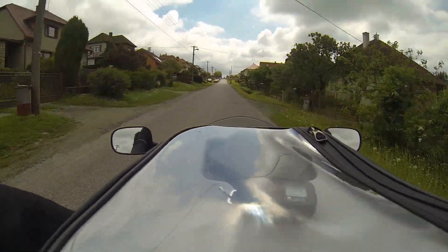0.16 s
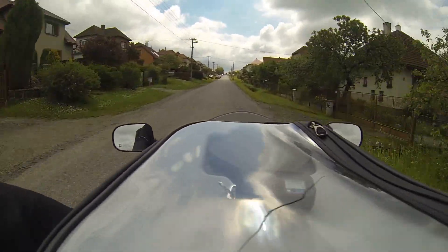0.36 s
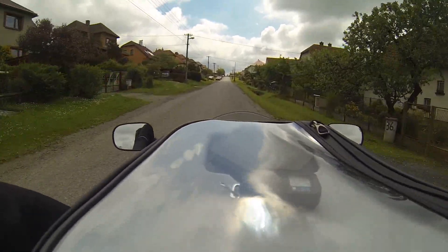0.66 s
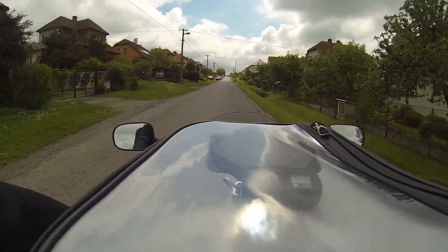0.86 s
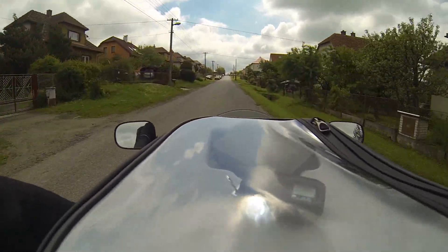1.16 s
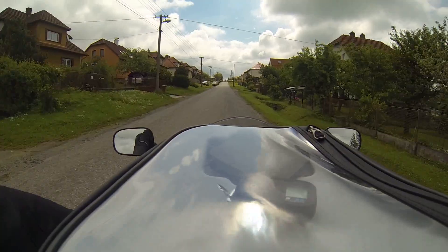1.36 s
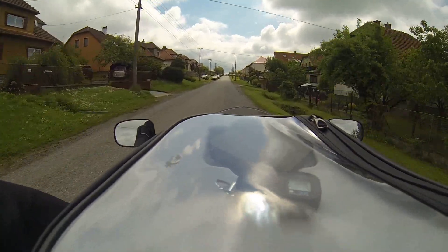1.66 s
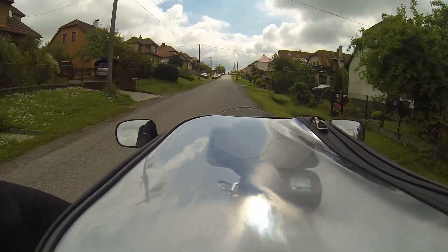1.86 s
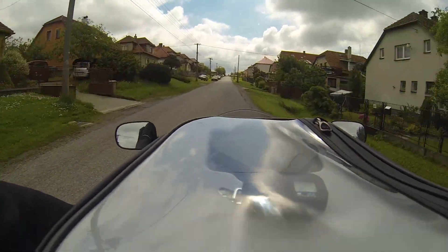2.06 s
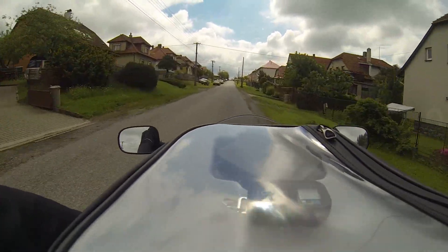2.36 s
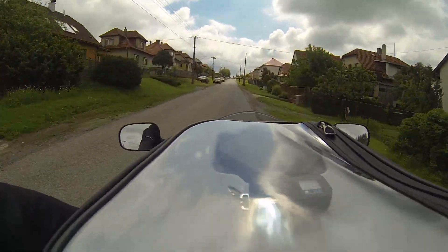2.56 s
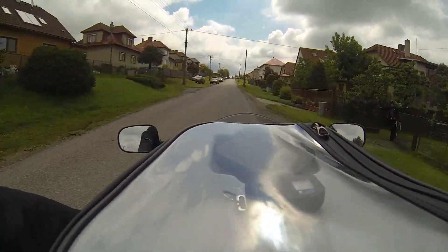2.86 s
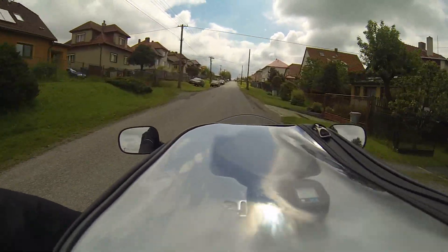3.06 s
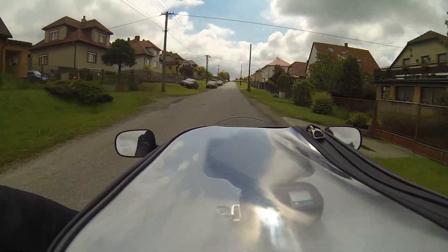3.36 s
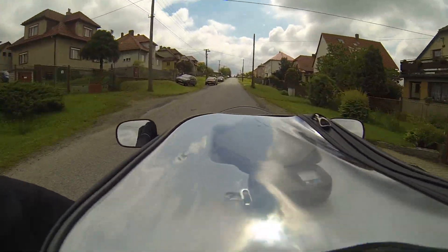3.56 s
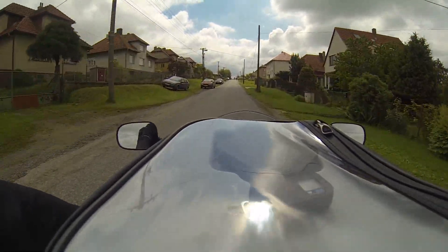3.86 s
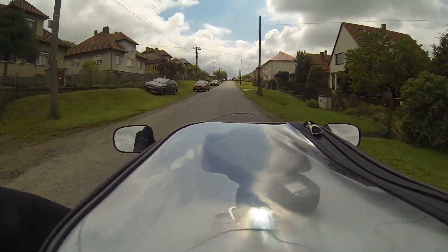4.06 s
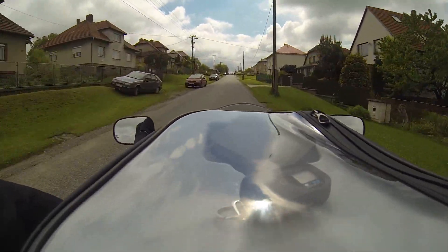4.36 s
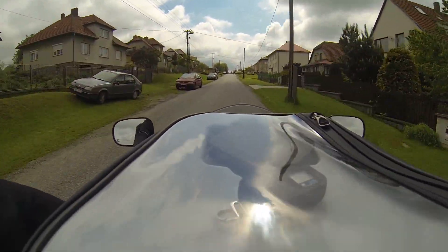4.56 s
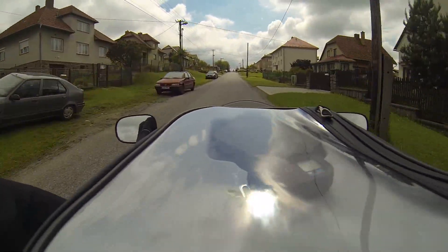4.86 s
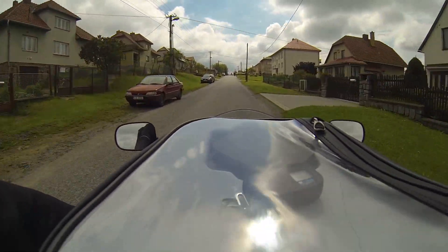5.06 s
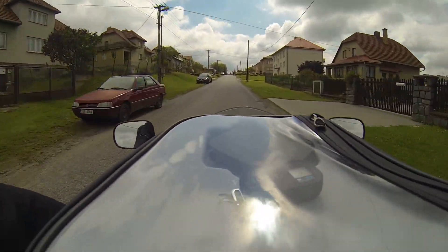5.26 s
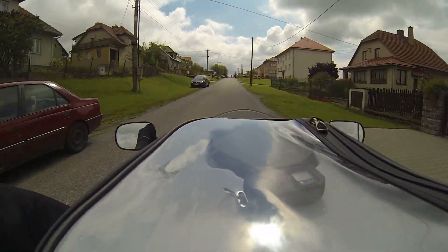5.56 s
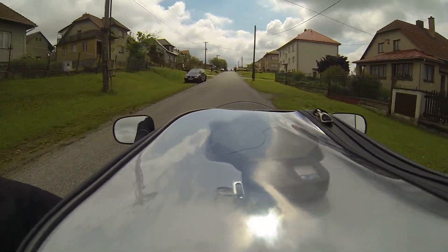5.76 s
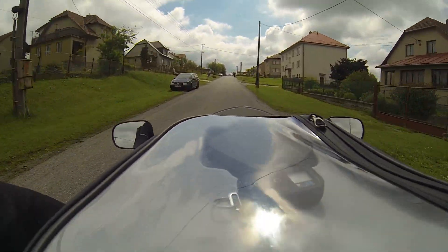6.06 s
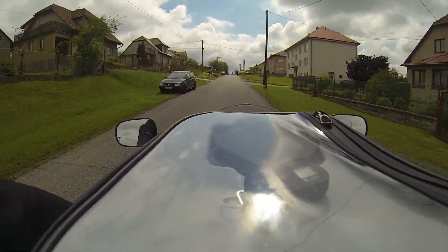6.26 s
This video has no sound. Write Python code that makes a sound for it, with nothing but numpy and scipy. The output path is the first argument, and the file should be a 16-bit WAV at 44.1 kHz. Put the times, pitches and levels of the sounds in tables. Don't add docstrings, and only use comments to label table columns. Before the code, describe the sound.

Deep, fluttering wind rumble and muffled hiss on a motorcycle ride, interrupted by loud thumping jolts after which the level drops and swells back.

```python
import sys
import numpy as np
from scipy import signal
from scipy.fft import rfft, irfft, next_fast_len
from scipy.io import wavfile
from scipy.ndimage import uniform_filter1d

SR = 44100
rng = np.random.default_rng(int(sys.argv[2]) if len(sys.argv) > 2 else 0)


def unload_audio(sound):
    columns = np.transpose(np.atleast_2d(sound))
    steps = np.round(np.clip(columns, -1, 1) * 32767)
    wavfile.write(sys.argv[1], SR, steps.astype(np.int16))


def how_loud(loudness_db):
    steps = np.asarray(loudness_db, float) / 20
    return 10 ** steps


N = 282681
TIME_S = np.arange(N) / SR


def curve(table):
    s, *columns = np.transpose(table)
    return [np.interp(TIME_S, s, column) for column in columns]


def unit(x):
    return x / np.sqrt(np.mean(x ** 2))


def bandpass(x, order, lo_hz, hi_hz):
    return signal.sosfilt(signal.butter(order, [lo_hz, hi_hz], "bandpass", fs=SR, output="sos"), x)


def in_band(x, lo_hz, hi_hz):
    return x / np.sqrt(np.mean(bandpass(x, 4, lo_hz, hi_hz) ** 2))


def walk(rate_hz):
    hold = int(SR / rate_hz)
    steps = np.repeat(rng.standard_normal(1500), hold)[:N]
    return unit(uniform_filter1d(uniform_filter1d(steps, hold), hold))


def bands(shape, lo_hz, hi_hz, flicker_db, flicker_hz, shared_db, count, boost=()):
    size = next_fast_len(N)
    f = np.maximum(np.arange(size // 2 + 1) * SR / size, 1)
    hz, db = np.transpose(shape)
    colour_db = np.interp(np.log(f), np.log(hz), db)
    for centre_hz, width_hz, boost_db in boost:
        colour_db = colour_db + boost_db * np.exp(-2 * ((f - centre_hz) / width_hz) ** 2)
    rolloff = np.sqrt(1 + (f / hi_hz) ** 8)
    noise = rfft(rng.standard_normal(size)) * how_loud(colour_db) / rolloff
    place = 2 * np.log2(f / lo_hz)
    out = np.zeros(N)
    for k in range(count):
        window = np.cos(np.pi / 2 * np.clip(place - k, -1, 1)) ** 2
        out += irfft(noise * window, size)[:N] * how_loud(flicker_db * walk(flicker_hz))
    return out * how_loud(shared_db)


# frequency in Hz, density in dB per Hz.
LOWS_HZ_DB = [(3.5, -26), (6.0, 3.5), (21, 5), (43, -6.5), (76, -11.5), (152, -14.5), (256, -23),
              (308, -26), (338, -25.5), (520, -36), (680, -61), (1140, -120)]
# centre in Hz, width in Hz, boost in dB.
MOUNT_MODES = [(23.6, 9.4, -5.5), (38.8, 3.5, 6), (147, 110, 1)]


def buffet(eddies):
    push = bands(LOWS_HZ_DB, 9.6, 68, 1.0, 7.4, 0.24 * eddies, count=8, boost=MOUNT_MODES)
    push = in_band(push, 8.6, 70)
    power = uniform_filter1d(push ** 2, SR // 9)
    return in_band(push / power ** .3, 12, 70)


def drone(eddies):
    rumble = bands(LOWS_HZ_DB, 86.8, 453, 1.0, 20, 0.56 * eddies, count=7, boost=MOUNT_MODES)
    return in_band(rumble, 51, 450)


# frequency in Hz, density in dB per Hz.
HISS_HZ_DB = [(380, 1), (500, -11), (1100, -9), (1800, -10.5), (2800, -20.5), (3600, -21), (4500, -28.5),
              (6000, -36), (8600, -42), (10500, -45.5), (13200, -53.5), (14500, -53), (15500, -61)]
# centre in Hz, width in Hz, boost in dB.
CAVITIES = [(644, 51, 4.5), (1390, 296, 11.5), (2125, 180, -4), (2460, 440, 5), (3172, 73, -12),
            (3306, 300, 3.5), (3920, 230, 3.5), (4150, 265, -5.5), (5000, 310, 5), (6780, 290, 4.5),
            (7940, 690, 4.5)]
# time in seconds, level in dB relative to the hiss.
WHISTLE_S_DB = [(0, -44), (1.1, -40), (1.3, -27.5), (2.9, -28.5), (3.1, -33), (6.1, -42), (6.25, -26),
                (6.41, -26)]


def hiss(eddies):
    puffs_db = 0.55 * walk(55) + 0.22 * walk(140) + 0.058 * eddies
    air = bands(HISS_HZ_DB, 452, 16000, 0.94, 24.834, puffs_db, count=11, boost=CAVITIES)
    edge = unit(bandpass(rng.standard_normal(N), 3, 5180, 5480))
    return in_band(air, 630, 3800) + edge * how_loud(curve(WHISTLE_S_DB)[0] + puffs_db)


# time in seconds, level in dB.
AIRSTREAM_S_DB = [(0, -4.5), (.15, -1.2), (.4, -2.5), (.78, 1), (1.1, -1), (1.4, -0.5), (2.1, 1), (2.5, 1),
                  (2.9, 0), (3.35, 2.5), (3.72, 2.5), (3.85, -0.5), (4.0, 2.5), (4.45, 2.5), (4.8, 1),
                  (5.3, 0.5), (5.8, 0), (6.41, 2)]
# centre in seconds, push in dB, rumble in dB, half length in seconds.
GUST_EVENTS = [(.21, -3.5, -1, .15), (0.53, -5, -1, .045), (0.704, -6, -0.5, .03), (.8, -0.5, 4.5, 0.052),
               (0.97, 5.5, 2.5, 0.036), (1.14, -10, -3.5, 0.043), (1.35, 2, -0.5, 0.049),
               (1.603, -2, 1, 0.065), (1.832, -14, -5, 0.025), (2.063, 6, 3.5, .04),
               (2.15, 1.5, -6.5, 0.055), (2.632, -8, -2.5, 0.049), (2.688, 9.5, 1.5, 0.022),
               (2.755, -1, 1, 0.034), (3.3, -1, 1.5, .1), (3.57, 4, -0.5, 0.039), (3.747, 9, 2, 0.017),
               (3.99, -4, 0, 0.023), (4.19, 0.5, 4, 0.04), (4.387, -4, -1.5, 0.23),
               (4.667, 4.5, 2.5, 0.021), (4.912, 4, -2, 0.067), (5.094, -4.5, -1, 0.13),
               (5.664, 4.5, -2.5, 0.042), (5.867, -6.5, -3.5, 0.034), (5.985, 7, -1, 0.034),
               (6.27, 2.5, -0.5, 0.059), (6.4, 8.5, 5, 0.028)]
BUFFET_DB, DRONE_DB, HISS_DB = -12.5, -23.5, -30
BUFFET_FOLLOWS, DRONE_FOLLOWS = 0.99, 0.74
HISS_GUST_SHARE = 0.055


def wind():
    gain_db, (air_db,) = gain_control(), curve(AIRSTREAM_S_DB)
    push_db, rumble_db = np.zeros(N), np.zeros(N)
    for s, gust_push_db, gust_rumble_db, half_s in GUST_EVENTS:
        bump = np.exp(-((TIME_S - s) / half_s) ** 2)
        push_db += gust_push_db * bump
        rumble_db += gust_rumble_db * bump
    buffet_db = BUFFET_DB + gain_db + BUFFET_FOLLOWS * air_db + push_db
    drone_db = DRONE_DB + gain_db + DRONE_FOLLOWS * air_db + rumble_db
    hiss_db = HISS_DB + gain_db + air_db + HISS_GUST_SHARE * push_db
    for s, *_ in SWING_EVENTS:
        buffet_db = buffet_db - 14 * np.exp(-((TIME_S - s - .004) / .028) ** 4)
    eddies = walk(7.4)
    lows = buffet(eddies) * how_loud(buffet_db) + drone(eddies) * how_loud(drone_db)
    return lows + hiss(eddies) * how_loud(hiss_db), hiss_db - 3.5


# start in seconds, depth in dB.
DUCK_EVENTS = [
    (-.3, -5.5),
    (0.863, -16.5),
    (2.915, -10),
    (4.727, -12.5),
    (5.918, -7),
    (6.095, -3),
]
DUCK_S, SETTLE_S, RECOVER_S = 0.0046, 0.068, 0.64
OVERSHOOT, OVERSHOOT_S = 0.13, 0.021


def gain_control():
    gain_db = np.zeros(N)
    for s, depth_db in DUCK_EVENTS:
        since_s = np.maximum(TIME_S - s, 0)
        fall = (np.minimum(since_s / DUCK_S, 1) + np.minimum(since_s / SETTLE_S, 1)) / 2
        overshoot = OVERSHOOT * np.exp(-np.abs(since_s - SETTLE_S) / OVERSHOOT_S)
        gain_db += depth_db * fall * (np.exp(-since_s / RECOVER_S) + overshoot)
    return gain_db


# crest in seconds, crest in dB, rate in Hz, backswing share, rebound share.
SWING_EVENTS = [
    (.890, -1, 50, 1.05, .2),
    (2.9305, -1, 48, .65, .25),
    (4.7425, -.5, 50, .15, .1),
    (5.935, -1, 46, .35, .95),
    (6.107, -2.5, 52, .42, .45),
]


def swings():
    out = np.zeros(N)
    for s, crest_db, hz, back, rebound in SWING_EVENTS:
        turn = hz * (TIME_S - s)
        size = np.interp(turn, [-.75, -.55, -.4, -.15, 0, .15, .5, 1, 1.5],
                         [0, back, back, .8, 1, .8, rebound, .3 * rebound, 0])
        out += how_loud(crest_db) * size * np.cos(2 * np.pi * turn)
    return out


# start in seconds, body in dB, shell in dB, lid in dB.
JOLT_EVENTS = [
    (.8750, -22.5, -9, -22.5),
    (2.9142, -25, -24, -43),
    (4.7257, -35, -14, -31),
    (5.9194, -6.5, -1.5, -27),
    (5.94, -26, -24, -46),
    (6.0934, -22.5, -12, -26.5),
]
# frequency in Hz, level in dB, t60 in seconds.
BODY_MODES = [(612, -6, 0.017), (965, -2, .035), (1233, 6.5, 0.018), (1480, 3, 0.012)]
SHELL_MODES = [(1740, -17, 0.028), (2220, -1.5, 0.012), (2580, -11.5, 0.026)]
LID_MODES = [(3520, -8, 0.026), (3880, -5, 0.02), (4830, -5.5, 0.015), (5330, -9.5, 0.012),
             (6500, -16, 0.014), (7100, -14, .012)]


def jolts():
    out, t = np.zeros(N + SR), np.arange(SR // 10) / SR
    contact = 1 - np.exp(-(t / 0.00076) ** 2)
    detunes = rng.standard_normal((len(JOLT_EVENTS), 12))
    for (s, *parts_db), detune in zip(JOLT_EVENTS, detunes):
        modes = [(hz, db + part_db, t60_s)
                 for part, part_db in zip((BODY_MODES, SHELL_MODES, LID_MODES), parts_db)
                 for hz, db, t60_s in part]
        ring = np.zeros(len(t))
        for (hz, db, t60_s), off in zip(modes, detune):
            decay = np.exp(-np.log(1000) * t / t60_s)
            ring += how_loud(db) * decay * np.sin(2 * np.pi * hz * (1 + 0.0096 * off) * t)
        start = int(s * SR)
        out[start:start + len(t)] += contact * ring
    return out[:N]


# time in seconds, second order in Hz, its level in dB, first order in dB above it.
ENGINE_CURVE = [(0, 308, -50, 4), (.5, 300, -51, 4), (1.16, 292, -51, 3), (1.63, 293, -43, 1),
                (2.09, 296, -41, 7), (2.79, 301, -41, 7), (3.25, 307, -42, 7), (3.72, 315, -40, 3),
                (4.1, 318.5, -39.5, 1), (4.45, 318, -40, 0), (4.7, 312, -42, 0), (5.1, 303, -49, 2),
                (5.6, 296, -46, 2), (6.41, 288, -49, 2)]
# multiple of the first order, level in dB above the second.
HIGHER_ORDERS = [(3, -16), (4, -20)]


def engine(heard_db):
    second_hz, line_db, first_db = curve(ENGINE_CURVE)
    phase = np.pi * np.cumsum(second_hz * (1 + .0015 * walk(20))) / SR
    hum = np.zeros(N)
    for order, db in [(1, first_db), (2, 0), *HIGHER_ORDERS]:
        hum += how_loud(db + 1.0 * walk(11)) * np.sin(order * phase)
    quick_db = heard_db - uniform_filter1d(heard_db, int(.7 * SR))
    return hum * how_loud(line_db + quick_db + 2.5)


# start in seconds, peak in dB, pitch
# in Hz, decay in seconds.
TICK_EVENTS = [(.882, -40.5, 7000, 0.0015), (0.888, -34, 4000, 0.002), (1.101, -44, 1400, 0.0039),
               (1.198, -51, 5400, .002), (1.358, -53, 8000, 0.0018), (2.185, -49, 11000, .002),
               (2.931, -42, 5000, 0.0027), (3.252, -25, 1450, 0.0059), (3.954, -28, 1600, 0.034),
               (3.985, -29, 1730, 0.033), (4.06, -36, 680, 0.038), (4.17, -36, 700, 0.055),
               (4.394, -22, 1360, 0.011), (4.640, -45, 9000, .002), (4.733, -39.5, 5060, 0.0027),
               (4.740, -16, 503, 0.0034), (4.7395, -21.5, 1070, 0.0049), (5.920, -53, 9400, .003),
               (6.007, -55, 9000, .002), (6.094, -54, 10000, .002), (6.169, -53, 8500, .002),
               (6.182, -54, 8000, .002), (6.366, -54, 8500, .003), (6.028, -42.5, 8350, 0.0014),
               (6.102, -46, 5100, .006), (6.239, -41, 5470, 0.0017), (6.396, -44, 8500, .003),
               (4.747, -28, 940, 0.011), (5.919, -16, 1700, 0.002), (6.099, -27, 1300, .007)]


def ticks():
    out, t = np.zeros(N + SR), np.arange(SR // 6) / SR
    noises = rng.standard_normal((len(TICK_EVENTS), len(t)))
    for (s, db, hz, decay_s), noise in zip(TICK_EVENTS, noises):
        burst = unit(bandpass(noise, 2, .8 * hz, 1.25 * hz))
        envelope = np.exp(-t / decay_s) * np.minimum(4 * t / decay_s, 1) ** 2
        start = int(s * SR)
        out[start:start + len(t)] += how_loud(db + 0.5) * burst * envelope
    return out[:N]


def grit(heard_db):
    speck_db = np.minimum(3.0 * rng.exponential(size=N), 6)
    hits = (rng.random(N) < 70 / SR) * rng.standard_normal(N) * how_loud(speck_db)
    smear = np.convolve(np.abs(hits), np.exp(-np.arange(200) / 45))[:N]
    high = bandpass(rng.standard_normal(N), 2, 8000, 14000)
    return smear * high * how_loud(heard_db - 25)


def scene():
    air, heard_db = wind()
    end_fade = np.clip((N - np.arange(N)) / 900 + .45, 0, 1)
    mix = air * end_fade + swings() + jolts() + engine(heard_db) + ticks() + grit(heard_db)
    return mix[None]


def top_cut(x):
    return signal.sosfilt(signal.butter(12, 15350, fs=SR, output="sos"), x)


def record(dry):
    rounded = dry / (1 + np.abs(dry) ** 8) ** (1 / 8)
    return top_cut(rounded)


dry = scene()
out = record(dry)
unload_audio(out)
```